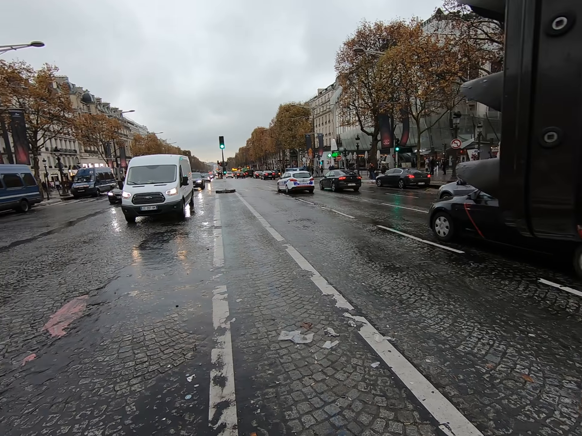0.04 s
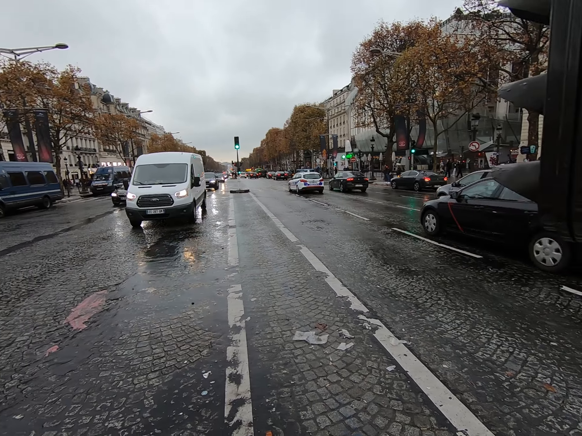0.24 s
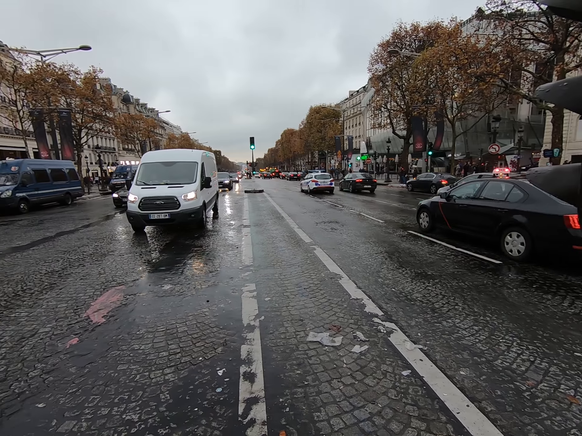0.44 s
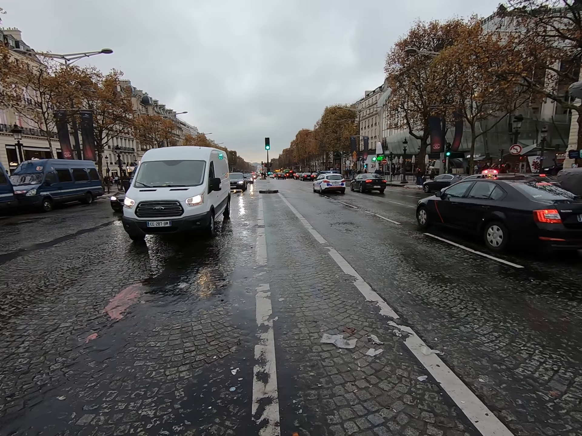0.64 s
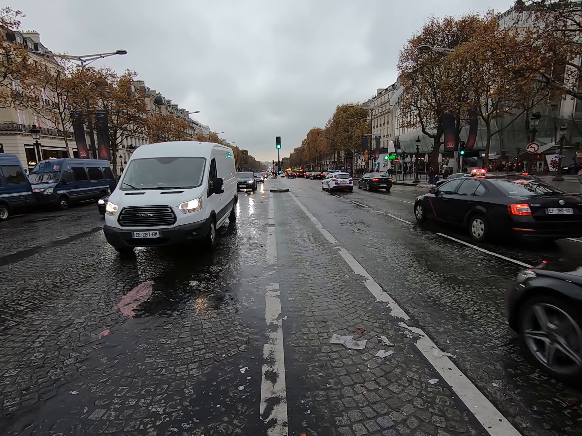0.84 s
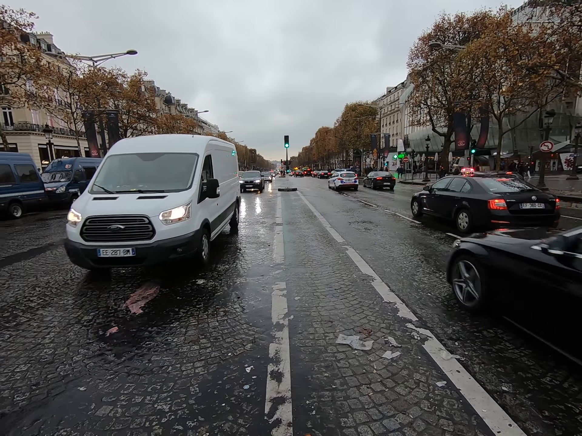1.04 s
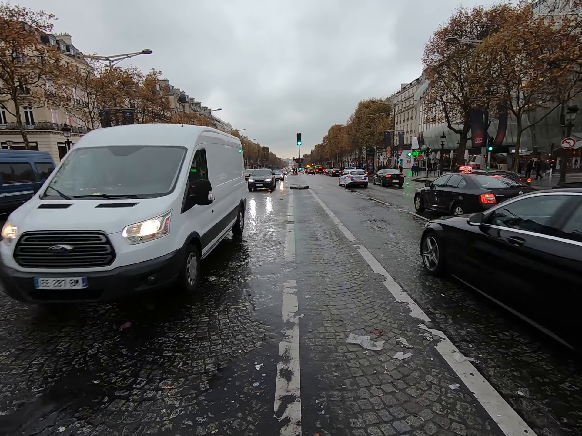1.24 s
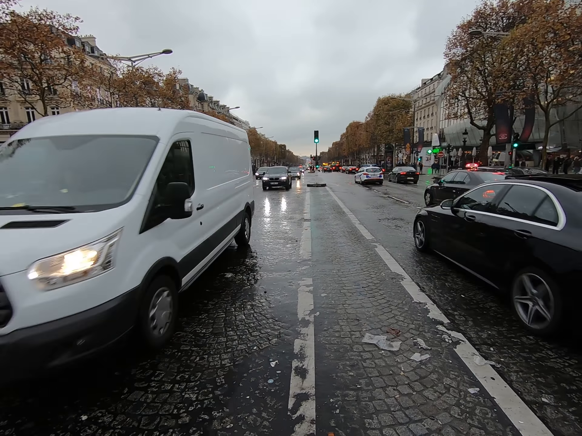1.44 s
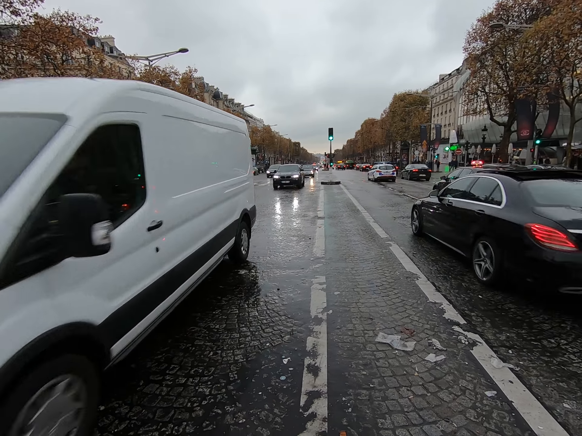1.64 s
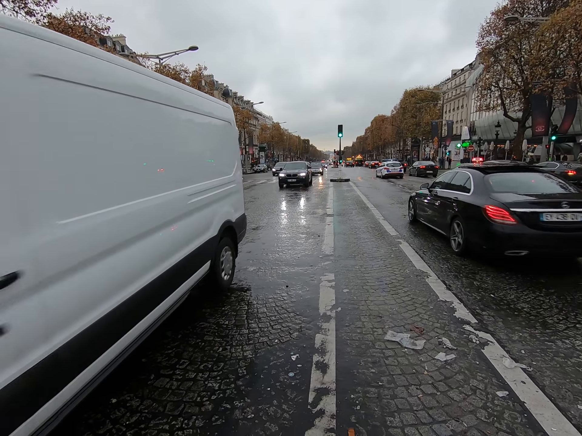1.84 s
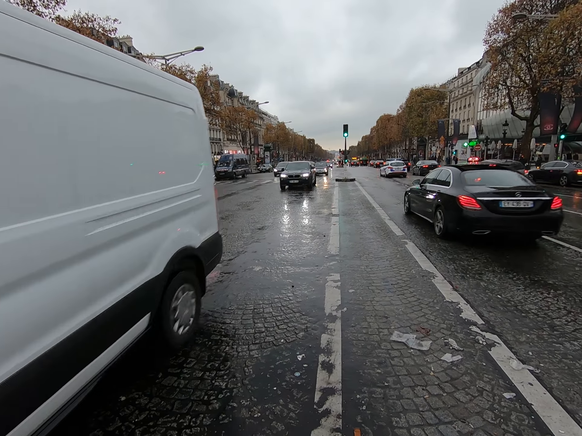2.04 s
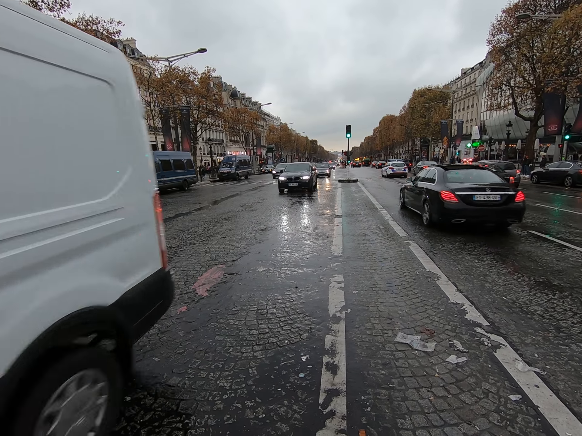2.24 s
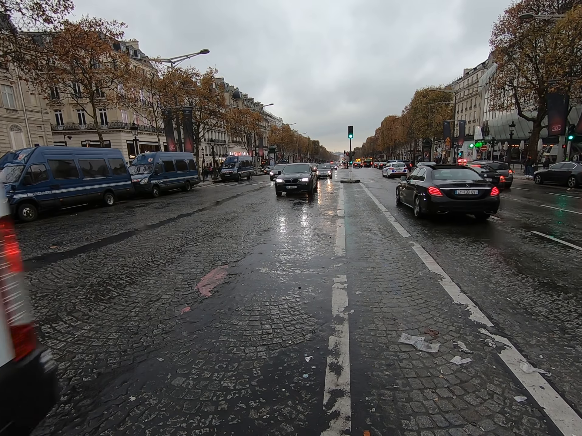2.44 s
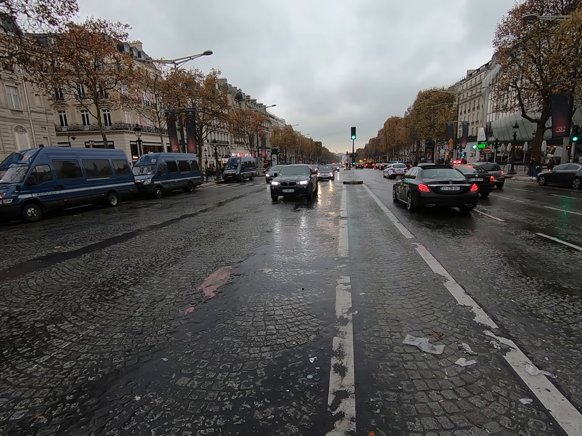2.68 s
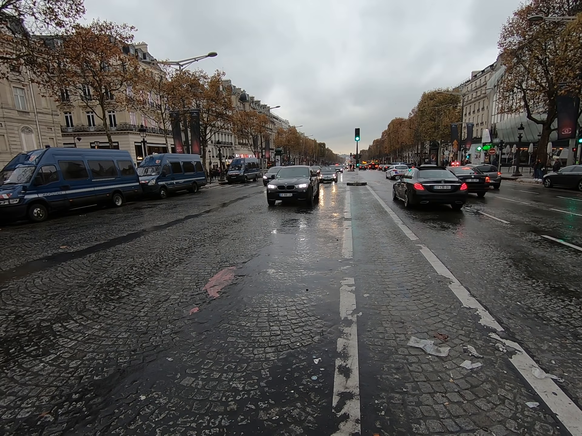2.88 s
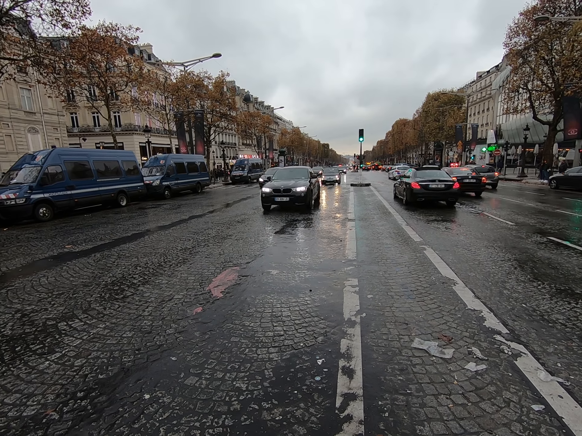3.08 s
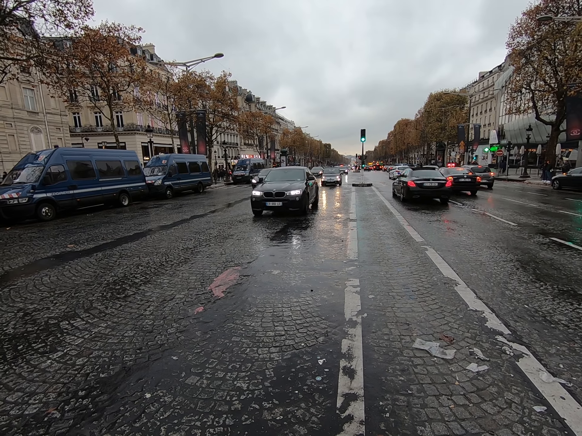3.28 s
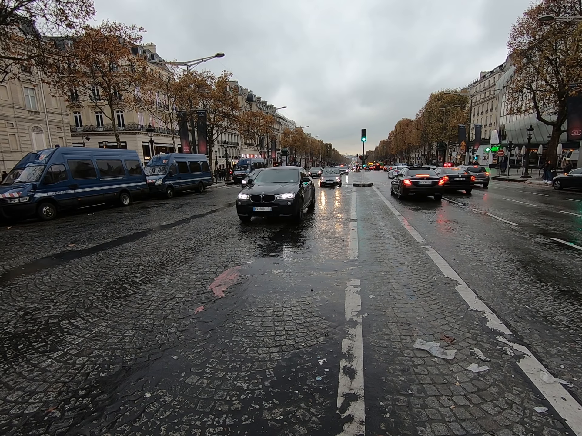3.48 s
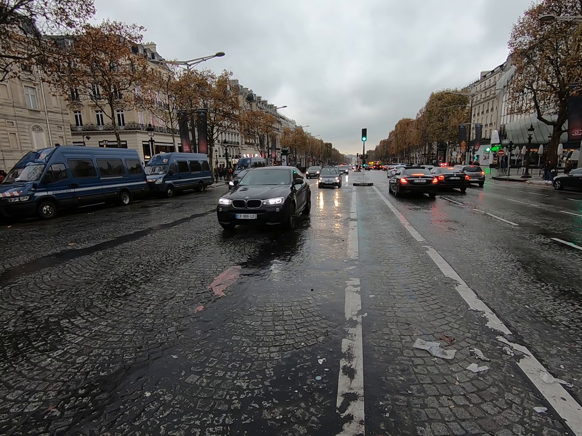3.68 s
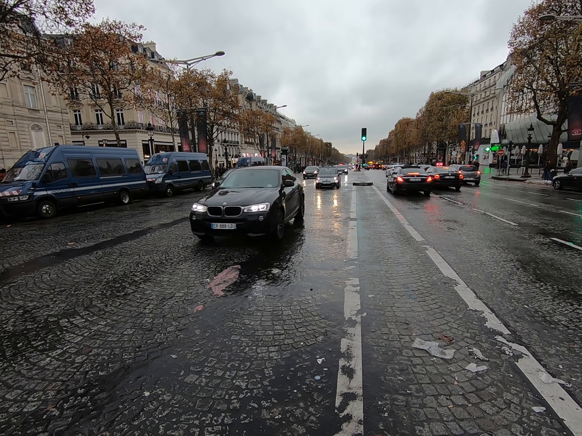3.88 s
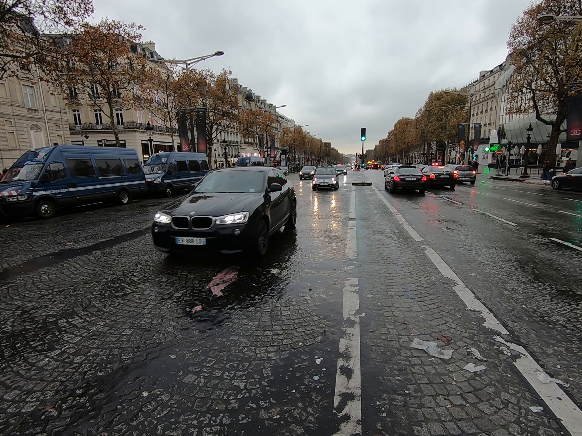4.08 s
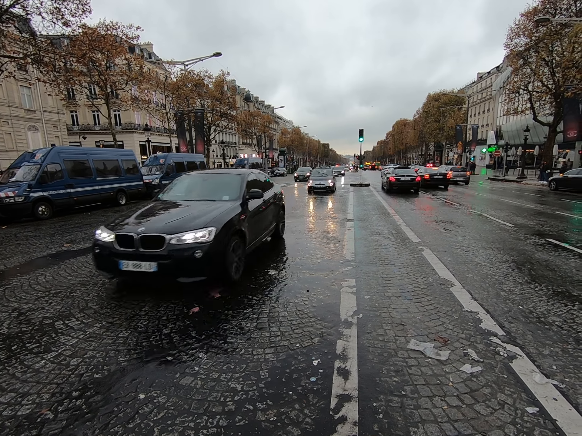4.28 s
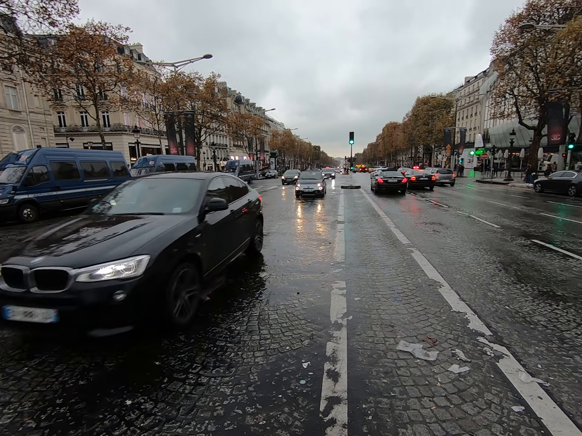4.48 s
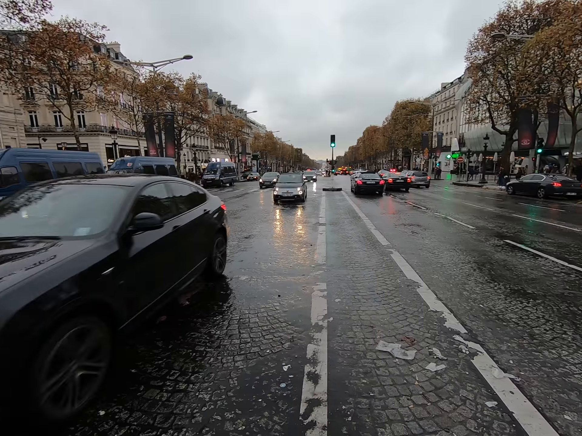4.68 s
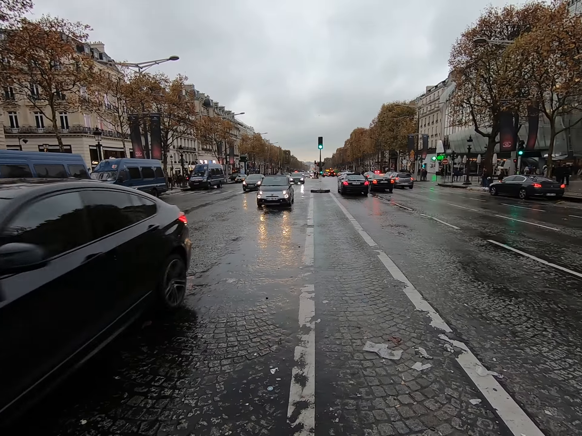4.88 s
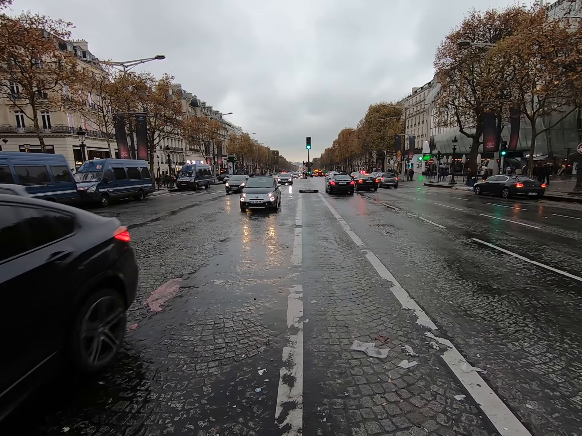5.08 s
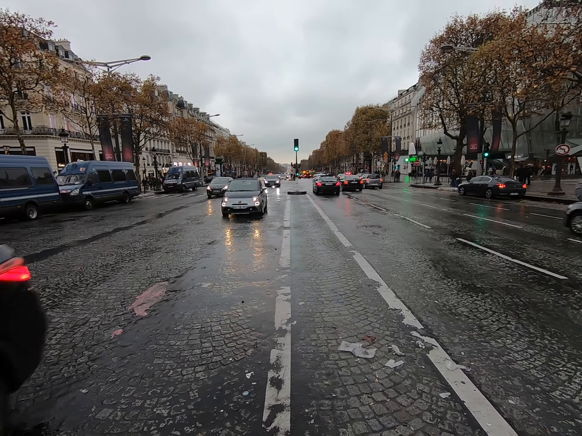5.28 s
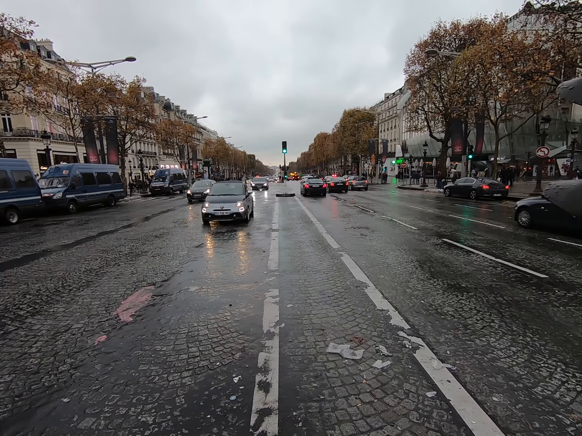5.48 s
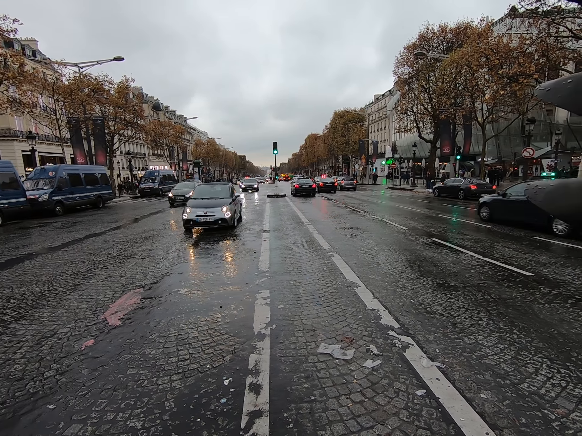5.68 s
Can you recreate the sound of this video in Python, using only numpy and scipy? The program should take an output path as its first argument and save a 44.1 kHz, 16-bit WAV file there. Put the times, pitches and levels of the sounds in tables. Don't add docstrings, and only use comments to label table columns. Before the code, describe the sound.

Outdoor city traffic on wet stones, bass-heavy and single-microphone. Continuous low rumble and tyre drumming underlie everything. Vehicles on both sides swish past early, the van loudest and wettest near two seconds, its low engine note sinking as it leaves. After a thinner moment with a very faint distant brake squeal, a car comes by with a rougher tyre roar and wavering whine, and more traffic approaches at the end.

```python
import sys
import numpy as np
from scipy import signal
from scipy.fft import rfft, irfft, next_fast_len
from scipy.io import wavfile
from scipy.ndimage import uniform_filter1d, minimum_filter1d, map_coordinates

SR = 44100
rng = np.random.default_rng(int(sys.argv[2]) if len(sys.argv) > 2 else 0)


def volts_from_decibels(level):
    exponent = np.asarray(level, float) / 20
    return 10 ** exponent


def to_wav(sig):
    pcm = np.clip(np.atleast_2d(sig), -1, 1) * 32767
    pcm = np.round(pcm).astype(np.int16)
    wavfile.write(sys.argv[1], SR, pcm.T)


N = 252604
TIME = np.arange(N) / SR


def unit(x):
    return x / np.sqrt(np.mean(x ** 2) + 1e-20)


def curves(rows):
    seconds, *columns = np.transpose(rows)
    return [np.interp(TIME, seconds, column) for column in columns]


def wobble(rate):
    knots = rng.standard_normal(int(N * rate / SR) + 4)
    return map_coordinates(knots, [np.arange(N) * rate / SR])


def swell(middle_s, length_s):
    return np.exp(-2 * ((TIME - middle_s) / length_s) ** 2)


def rush(spectrum, patchy_db=0., grit=0., rate=300):
    z = signal.stft(rng.standard_normal(N), nperseg=512)[2]
    patches = uniform_filter1d(rng.standard_normal(z.shape), 5, 0)
    patches = uniform_filter1d(patches, 10, 1)
    hiss = unit(signal.istft(z * volts_from_decibels(patchy_db * unit(patches)), nperseg=512)[1][:N])
    droplets = (rng.random(N) < rate / SR) * rng.standard_normal(N)
    size = next_fast_len(N + 8192)
    hz, db = np.transpose(spectrum)
    gain = volts_from_decibels(np.interp(np.log(np.fft.rfftfreq(size, 1 / SR) + 1), np.log(hz + 1), db))
    return unit(irfft(rfft(hiss + grit * unit(droplets), size) * gain, size)[:N])


def tone(rows, unsteady_hz, flutter_db, second_db, fade_s=0.044):
    hz, db = curves(rows)
    gate = np.clip(np.minimum(TIME - rows[0][0], rows[-1][0] - TIME) / fade_s + .5, 0, 1)
    phase = 2 * np.pi * np.cumsum(hz + unsteady_hz * wobble(12)) / SR
    wave = np.sin(phase) + volts_from_decibels(second_db) * np.sin(2 * phase)
    return np.sqrt(2) * gate * volts_from_decibels(db + flutter_db * wobble(14)) * wave


def nearness(column):
    # closest moment in seconds, approach in seconds, tread and water in dB over the far traffic.
    wheel_passes = [(.35, 0.23, -1, 1.5), (.9, 0.33, -2.5, 2), (1.33, .2, -0.5, 5), (1.6, 0.3, -7, 9),
                    (1.84, 0.23, 5.5, 10.5), (2.4, 0.27, -2, 5), (3.05, 0.18, -4, -2.5),
                    (3.551, .25, -2, 0), (3.85, 0.16, 3, -8), (4.45, 0.38, 5.5, -8), (4.87, 0.15, 0, 2),
                    (5.35, 0.31, 1.5, -3), (5.7, .2, 2.5, -7)]
    leave_share = 0.56
    power = 1
    for row in wheel_passes:
        closest_s, approach_s = row[:2]
        width_s = np.where(TIME < closest_s, approach_s, leave_share * approach_s)
        power = power + volts_from_decibels(2 * row[column]) / (1 + ((TIME - closest_s) / width_s) ** 2)
    return 10 * np.log10(power)


def layer_db(near_db, far_db, weight_share, near_share, shadow_db):
    # time in seconds, weight in dB.
    far_weight = [(0, 1.5), (.4, 2.5), (1.1, 0), (1.45, 0.5), (1.7, -2), (2.2, -1.5), (2.6, -3), (3, -2),
                  (3.2, -2), (3.45, -.5), (3.9, 1), (4.3, -6.5), (4.55, -3), (4.85, 1), (5.1, 2), (5.4, -1),
                  (5.73, 0.5)]
    weight_db, = curves(far_weight)
    shadow = swell(2.22, 1)
    return far_db + weight_share * weight_db + near_share * near_db - shadow_db * shadow


def cobbles(tread_db):
    # frequency in Hz, level in dB per Hz.
    ground_colour = [(12, -51.5), (20, -17), (30, -11), (43, -6.5), (58, -10), (68, -5.5), (110, -120)]
    # frequency in Hz, level in dB per Hz.
    thud_colour = [(35, -120), (56, -20.5), (66, 0), (97, -2.5), (120, -9.5), (160, -41), (260, -120)]
    # frequency in Hz, level in dB per Hz.
    drum_colour = [(62, -27.5), (105, 1), (210, -4.5), (280, -23.5), (360, -48), (620, -120)]
    # frequency in Hz, level in dB per Hz.
    boom_colour = [(140, -22), (240, -2.5), (282, 1.5), (334, -8.5), (472, -9), (520, -12.5), (680, -51),
                   (1140, -120)]
    # middle in seconds, length in seconds, gain in dB.
    road_hollows = [(0.594, 0.18, 9.5), (0.94, 0.36, 9.5), (1.407, 0.081, 0), (1.65, .1, 4),
                    (2.05, 0.096, -2), (2.703, 0.38, 2.5), (3.149, 0.16, 8), (3.642, 0.24, 3),
                    (4.5, .14, -11), (4.88, 0.075, 3.5), (5.1, 0.14, -3), (5.6, .25, 5)]

    ground_db = layer_db(tread_db, far_db=-29.5, weight_share=-0.3, near_share=0.23, shadow_db=-1)
    ground = volts_from_decibels(ground_db + 1.7 * wobble(5)) * rush(ground_colour)

    thud_db = layer_db(tread_db, far_db=-26, weight_share=.4, near_share=.1, shadow_db=-1.2)
    thud = volts_from_decibels(thud_db + 0.5 * wobble(5)) * rush(thud_colour)

    drum_db = layer_db(tread_db, far_db=-25.5, weight_share=1.24, near_share=0.16, shadow_db=0.8)
    drum = volts_from_decibels(drum_db + 0.4 * wobble(6.5)) * rush(drum_colour, patchy_db=1.13)

    boom_db = layer_db(tread_db, far_db=-47.5, weight_share=-0.16, near_share=0.11, shadow_db=1.2)
    for middle_s, length_s, gain_db in road_hollows:
        boom_db = boom_db + gain_db * swell(middle_s, length_s)
    boom = volts_from_decibels(boom_db + 3.1 * wobble(9)) * rush(boom_colour, patchy_db=-2.4, grit=0.26, rate=40)
    return ground + thud + drum + boom


def treads(tread_db):
    # frequency in Hz, level in dB per Hz.
    roar_colour = [(280, -11), (480, -7.5), (632, 2.5), (830, -1.5), (1080, -41), (1830, -120)]
    # frequency in Hz, level in dB per Hz.
    horn_colour = [(480, -32.5), (810, -0.5), (908, -0.5), (1160, -8), (1510, -22.5), (2550, -120)]
    # frequency in Hz, level in dB per Hz.
    upper_colour = [(670, -21), (1140, -4.5), (1470, -0.5), (1620, -7), (2110, -34), (3560, -120)]
    # frequency in Hz, level in dB per Hz.
    edge_colour = [(930, -34.5), (1580, -0.5), (1880, -1), (2300, -5.5), (2990, -35.5), (5060, -120)]
    jolt = wobble(16)

    roar_db = layer_db(tread_db, far_db=-42.5, weight_share=0.35, near_share=.5, shadow_db=3.5)
    roar = volts_from_decibels(roar_db + 0.31 * jolt) * rush(roar_colour, patchy_db=1.75, grit=0.22, rate=51)

    horn_db = layer_db(tread_db, far_db=-44.5, weight_share=-0.16, near_share=0.7, shadow_db=-0.1)
    horn = volts_from_decibels(horn_db + 0.78 * jolt) * rush(horn_colour, patchy_db=-1.3, grit=0.23, rate=60)

    upper_db = layer_db(tread_db, far_db=-49, weight_share=0.26, near_share=0.71, shadow_db=-0.3)
    upper = volts_from_decibels(upper_db + 0.34 * jolt) * rush(upper_colour, patchy_db=0.05, grit=.2, rate=290)

    edge_db = layer_db(tread_db, far_db=-54.5, weight_share=0, near_share=1.04, shadow_db=-0.8)
    edge = volts_from_decibels(edge_db) * rush(edge_colour, patchy_db=-0.1, grit=0.26, rate=23)
    return roar + horn + upper + edge


def water(water_db, tread_db):
    # frequency in Hz, level in dB per Hz.
    swish_colour = [(1260, -35), (2150, -5), (2560, -4), (3400, -4.5), (4420, -11), (7480, -120)]
    # frequency in Hz, level in dB per Hz.
    spray_colour = [(1820, -31.5), (3100, 1), (4500, 0.5), (5850, -11.5), (9900, -120)]
    # frequency in Hz, level in dB per Hz.
    fizz_colour = [(2530, -17.5), (4300, -4.5), (5610, -2), (6700, -11), (8710, -42.5), (14700, -120)]
    # frequency in Hz, level in dB per Hz.
    mist_colour = [(5200, -30), (6300, -7), (7500, -9.5), (9600, -19), (10400, -26), (11000, -30.5),
                   (11600, -53), (14000, -120)]
    # frequency in Hz, level in dB per Hz.
    air_colour = [(9000, -120), (11400, -11), (12200, -0.5), (13200, -7), (14500, -7), (15700, -17.5),
                  (16500, -120)]
    splash = 0.29 * wobble(17) + 1.2 * wobble(35)

    swish_db = layer_db(water_db, far_db=-54, weight_share=0.44, near_share=0.59, shadow_db=3.5)
    swish_db = swish_db + 0.26 * tread_db + 0.27 * splash
    swish = volts_from_decibels(swish_db) * rush(swish_colour, patchy_db=0.4, grit=0.49, rate=220)

    spray_db = layer_db(water_db, far_db=-54, weight_share=-0.06, near_share=1.16, shadow_db=3.5)
    spray = volts_from_decibels(spray_db + 0.5 * splash) * rush(spray_colour, patchy_db=0.8, grit=0.33, rate=620)

    fizz_db = layer_db(water_db, far_db=-54, weight_share=.05, near_share=1.1264, shadow_db=-1.3)
    fizz = volts_from_decibels(fizz_db + 0.42 * splash) * rush(fizz_colour, patchy_db=0.4, grit=0.39, rate=380)

    mist_db = layer_db(water_db, far_db=-63, weight_share=.1, near_share=0.82, shadow_db=1.5)
    mist = volts_from_decibels(mist_db + 0.5 * splash) * rush(mist_colour, patchy_db=1.0, grit=0.33, rate=370)

    air_db = 1.04 * mist_db - 19.0 + 1.2 * splash
    air = volts_from_decibels(air_db) * rush(air_colour, patchy_db=1.5, grit=.4, rate=320)
    return swish + spray + fizz + mist + air


def whine(tread_db):
    db = layer_db(tread_db, far_db=-47.5, weight_share=1.3, near_share=0.84, shadow_db=4.3)
    pitch_hz = 842.6 + 10 * TIME
    pitch_hz = pitch_hz + 100 * swell(5.45, .6)
    pitch_hz = pitch_hz + 22 * wobble(3) + 30 * wobble(5)
    phase = 2 * np.pi * np.cumsum(pitch_hz) / SR
    band = wobble(95) * np.sin(phase) + wobble(95) * np.cos(phase)
    return volts_from_decibels(db + 1.6 * wobble(4)) * band


def hums():
    # middle in seconds, length in seconds, pitch in Hz, glide in Hz per second, level in dB.
    far_engines = [
        (.2, 0.56, 95.2, 0, -23.5),
        (1.75, 0.24, 69.6, 0.5, -28),
        (2.45, 0.43, 67.05, 0, -19),
        (3.1, 0.61, 85.04, -4.5, -25),
        (3.55, 0.93, 57, 0, -27),
        (4.496, 3.8, 41, 3, -31),
        (5, 0.34, 100, -1.5, -28.5),
        (5.6, 0.33, 88.7, 0, -21.5),
    ]
    out = np.zeros(N)
    for middle_s, length_s, hz, glide, db in far_engines:
        pitch_hz = hz + glide * (TIME - middle_s) + 1.34 * wobble(10)
        level = np.sqrt(2) * volts_from_decibels(db + 1.1 * wobble(7.4)) * swell(middle_s, length_s / 2)
        out += level * np.sin(2 * np.pi * np.cumsum(pitch_hz) / SR)
    return out


def engines():
    # time in seconds, pitch in Hz, level in dB.
    van_firing = [
        (.3, 52.4, -23.5),
        (.45, 56.14, -19.5),
        (.75, 57.3, -30),
        (1.2, 57.32, -17.5),
        (1.56, 55.84, -25.5),
        (1.7, 54.8, -15.5),
        (2.15, 52.3, -17),
        (2.68, 43.15, -25.5),
        (3.1, 42.5, -23),
    ]
    # time in seconds, pitch in Hz, level in dB.
    car_firing = [
        (3.15, 45.43, -23),
        (3.45, 45.76, -27),
        (3.85, 46.98, -34),
        (4.1, 52.3, -23),
        (4.35, 51.08, -22),
        (4.55, 50.04, -26),
        (4.75, 49, -22),
        (5.2, 46, -26),
        (5.73, 47, -26),
    ]
    # time in seconds, pitch in Hz, level in dB.
    pull_firing = [
        (3.85, 75, -32),
        (4, 78, -26),
        (4.2, 81, -25),
        (4.35, 82, -31),
    ]
    van = tone(van_firing, unsteady_hz=0.78, flutter_db=0.0, second_db=-29.5)
    car = tone(car_firing, unsteady_hz=2.21, flutter_db=4.0, second_db=-8.5)
    pull = tone(pull_firing, unsteady_hz=.6, flutter_db=2.2, second_db=-16)
    return van + car + pull


def drops():
    # start in seconds, peak in dB, pitch in Hz, decay by 60 dB in seconds.
    housing_hits = [(1.4978, -15.5, 600, .014), (1.4985, -11.5, 400, .019), (1.5005, -8, 260, .026),
                    (5.162, -27, 480, .03), (.5475, -18.5, 600, .016), (1.4992, -15, 2550, .005),
                    (1.4994, -22, 3600, .003), (4.4480, -20.5, 870, .03), (.7455, -42, 7500, .003),
                    (1.4995, -48, 13500, .003), (3.6603, -22.5, 4500, .0035), (5.412, -44, 7200, .004)]
    out = np.zeros(N + SR)
    t = np.arange(SR // 10) / SR
    for start_s, db, hz, t60_s in housing_hits:
        onset = (1 - np.exp(-2 * t * hz)) ** 2
        ring = volts_from_decibels(db - 60 * t / t60_s) * onset * np.sin(2 * np.pi * hz * t)
        out[round(start_s * SR):][:len(t)] += ring
    return out[:N]


def brake():
    # time in seconds, pitch in Hz, level in dB.
    squeal = [
        (2.9, 1160, -56),
        (3, 1185, -52.5),
        (3.1, 1205, -50.5),
        (3.2, 1210, -55),
    ]
    return tone(squeal, unsteady_hz=12, flutter_db=4, second_db=-40)


def scene():
    tread_db = nearness(column=2)
    water_db = nearness(column=3)
    tyres = cobbles(tread_db) + treads(tread_db) + water(water_db, tread_db) + whine(tread_db)
    return (tyres + hums() + engines() + drops() + brake())[None]


def top_cut(x):
    return signal.sosfilt(signal.butter(12, 15720, fs=SR, output="sos"), x)


def record(dry):
    need = np.minimum(1, volts_from_decibels(-8.3) / (np.abs(dry) + 1e-9))
    held = minimum_filter1d(need, size=900, axis=1)
    gain = uniform_filter1d(held, size=600, axis=1)
    return top_cut(dry * gain)


dry = scene()
out = record(dry)
to_wav(out)
```